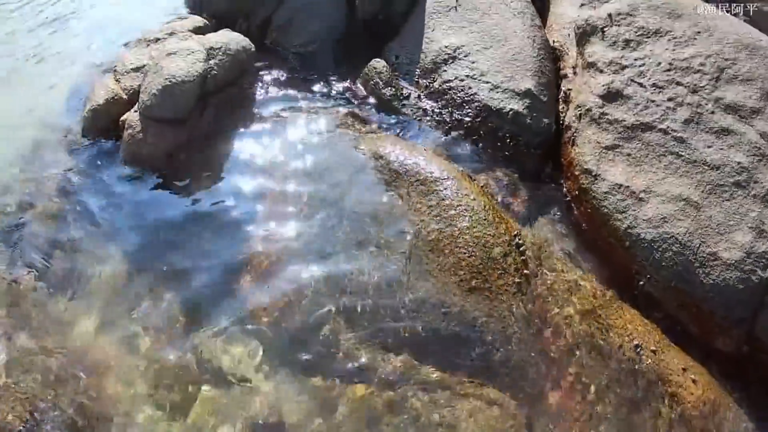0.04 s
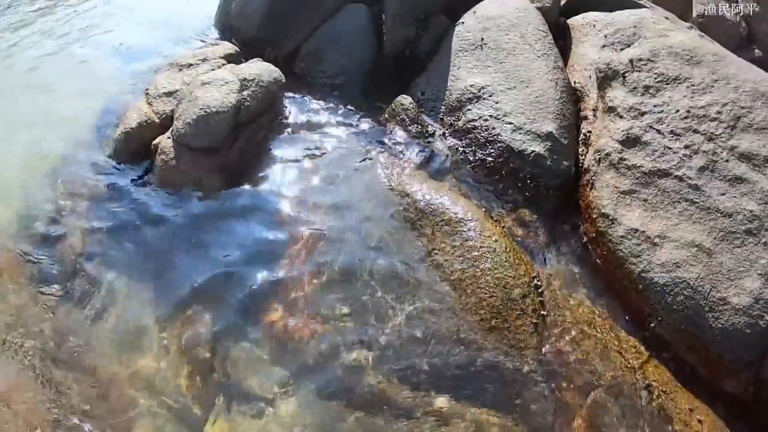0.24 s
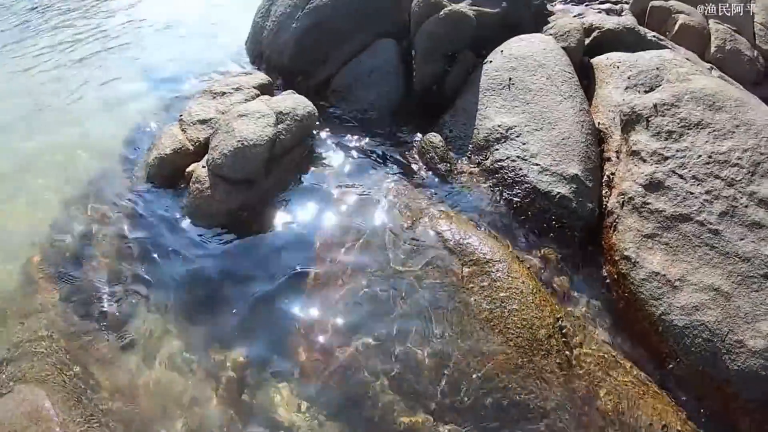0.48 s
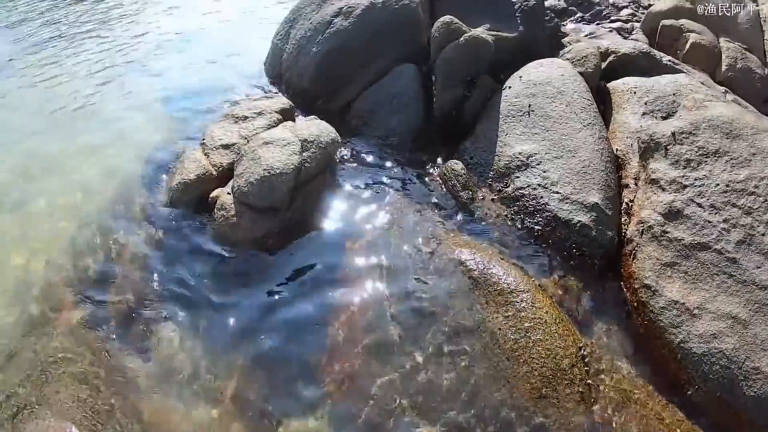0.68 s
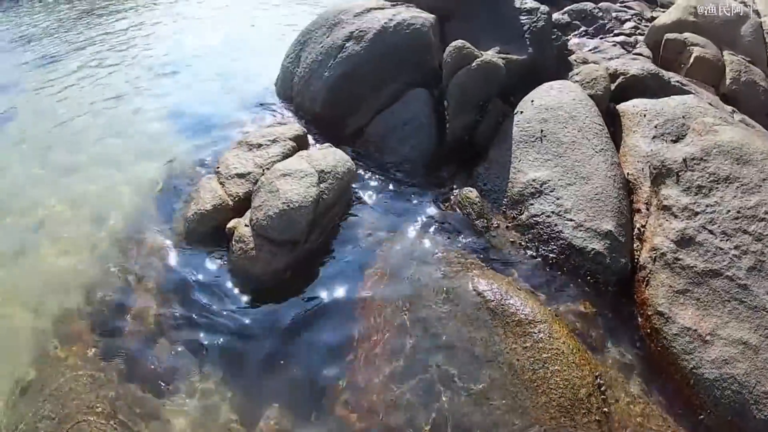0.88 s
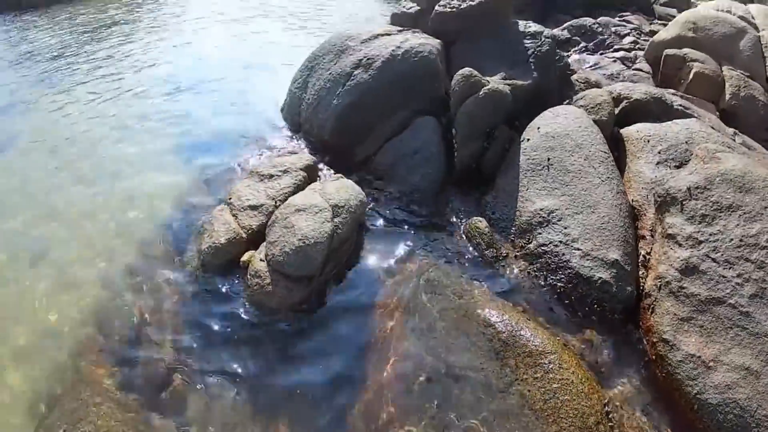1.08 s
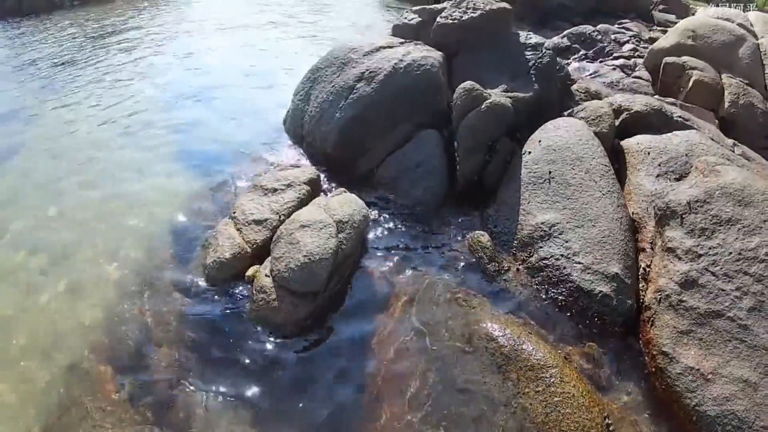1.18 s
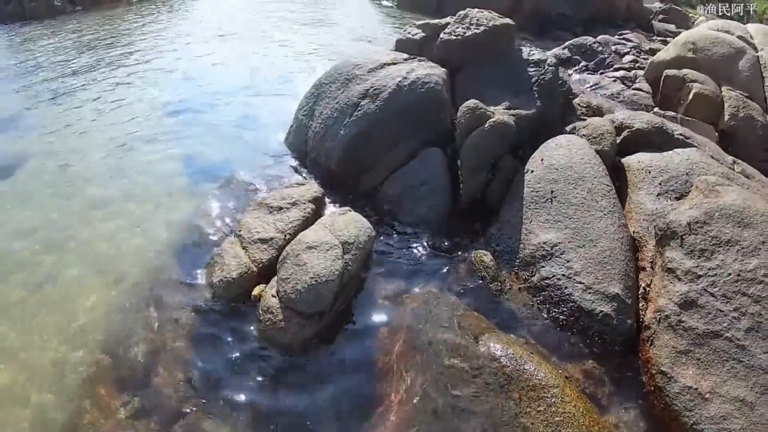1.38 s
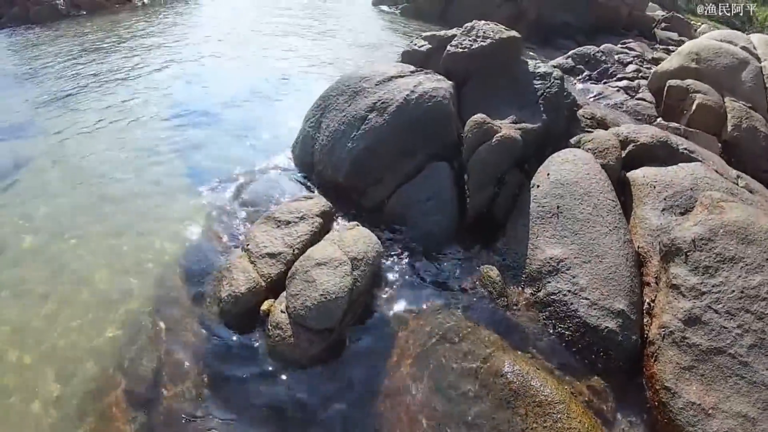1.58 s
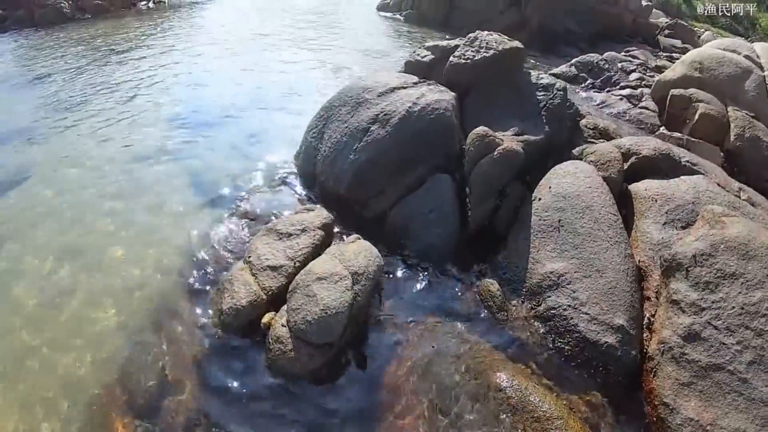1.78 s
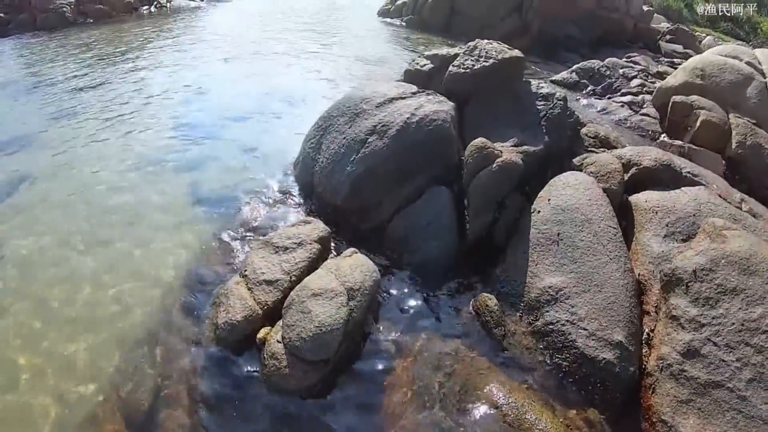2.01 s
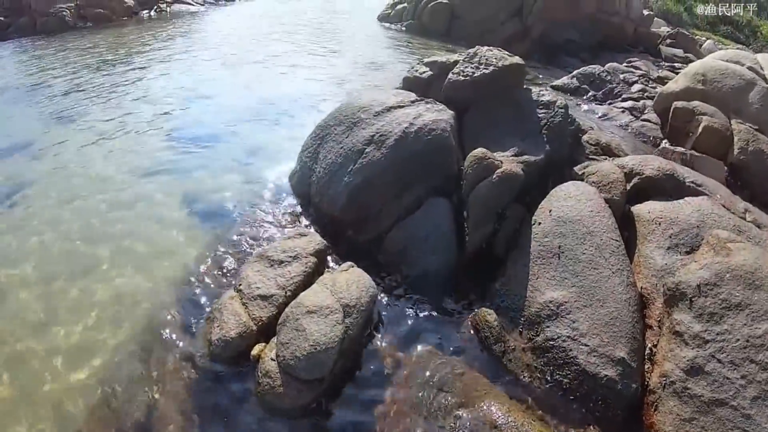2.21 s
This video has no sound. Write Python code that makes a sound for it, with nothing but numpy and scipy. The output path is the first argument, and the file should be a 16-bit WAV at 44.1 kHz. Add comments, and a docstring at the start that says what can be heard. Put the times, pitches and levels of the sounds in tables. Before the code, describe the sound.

Shallow seawater laps among rocks, with a quick gulping slap, then soft trickles.

```python
"""Faint ticks of water, then a run of sharp knocks as a wavelet slaps into a rock hollow close by.
Each impact rings a cleft between the boulders, and trapped air resonates beneath it in low gulps.
Two gentler laps follow, their bubbles ringing as damped oscillators in trickles and rising gurgles.
Behind the shallow seawater lie the hiss of the shore and a light breeze on the microphone."""
import sys
import numpy as np
from scipy import signal
from scipy.fft import rfft, irfft, next_fast_len
from scipy.io import wavfile
from scipy.ndimage import uniform_filter1d

SR = 44100
rng = np.random.default_rng(int(sys.argv[2]) if len(sys.argv) > 2 else 0)


def persist_wave(psi):
    """Save psi, clipped to +-1, as 16-bit WAV."""
    counts = np.round(np.clip(psi, -1, 1) * 32767).astype(np.int16)
    wavfile.write(sys.argv[1], SR, np.atleast_2d(counts).T)


N = 99225

# spectra of a splash's dull body and bright spray (frequency [Hz], gain [dB])
BODY_SPECTRUM = [(100, -44), (250, -6.5), (480, -5), (1000, -1.5), (1400, -3), (2500, -68.5)]
SPRAY_SPECTRUM = [(2000, -10), (3600, -6.5), (5000, 3), (6300, 3), (8500, 1), (9400, -10), (10300, -6.5),
                  (11500, -24.5), (14000, -22), (16000, -53)]


def slaps():
    """Impact excitation: water knocks in the hollow, and the cleft's normal modes ring briefly."""
    # impacts (time [s], body level [dB], clack level [dB], spray level [dB])
    impacts = np.array([(0.2205, -25.5, -19.5, -12.5), (.232, -25, -26.5, -21), (0.2455, -34, -21, -23),
                        (0.2667, -16, -23.5, -30), (0.278, -18.5, -24, -27.5), (0.294, -16, -18.5, -36.5),
                        (0.306, -16, -24, -35), (0.384, -22, -33, -60), (0.439, -24.5, -37, -56),
                        (0.4642, -22.5, -21.5, -36), (0.4813, -52, -26, -24), (0.503, -29.5, -31, -64),
                        (0.5257, -23.5, -21.5, -21.5), (0.549, -29, -33.5, -39), (0.581, -23.5, -30, -50),
                        (0.618, -33, -60, -63), (0.653, -29, -30.5, -31.5), (0.6617, -37, -32, -34.5),
                        (0.678, -31, -27.5, -38.5), (0.703, -33.5, -37, -38)])
    # modes of the cleft (frequency [Hz], relative level [dB])
    cleft_modes = [(444, 0), (706, -1), (924, 10), (1097, -5), (1173, -22), (1288, -11), (1558, 2.5),
                   (1686, -11), (1931, -10)]
    ring_db, ring_t60_s = -15, 0.083
    body = bursts(impacts[:, [0, 1]], noise(BODY_SPECTRUM), decay_s=0.0066, tail_db=-21, tail_s=0.035)
    clack = bursts(impacts[:, [0, 2]], pops(), decay_s=0.0053, tail_db=-16.5, tail_s=0.023)
    spray = bursts(impacts[:, [0, 3]], noise(SPRAY_SPECTRUM), decay_s=0.0034, tail_db=-11.5, tail_s=0.0062)
    t = np.arange(SR // 2) / SR
    modes = sum(undb(db) * np.sin(2 * np.pi * hz * t) for hz, db in cleft_modes)
    modes *= np.exp(-np.log(1000) * t / ring_t60_s)
    ring = np.zeros(N)
    for start, body_db, _, _ in impacts:
        add(ring, start, undb(body_db + ring_db) * modes)
    return place(body + clack + spray + ring, echo_db=-9, t60_s=0.032)


def gulps():
    """Cavity resonance: trapped air throbs, sinking in pitch until its pocket opens; the hollow churns."""
    # air pockets (time [s], frequency [Hz], level [dB], hold [s])
    pockets = [(0.221, 290, -22.5, 0.016), (0.254, 242, -15.5, 0.0074), (0.269, 284.6, -8.5, 0.017),
               (.27, 126.4, -20, 0.061), (0.2944, 250.4, -5, 0.026), (0.388, 264.4, -14, 0.023),
               (0.4427, 235, -19, 0.0064), (0.463, 326, -31.5, 0.0091), (0.487, 263, -23, 0.0067),
               (0.556, 275, -29, 0.03), (0.666, 242, -31.5, 0.035), (0.976, 310, -41, 0.0036),
               (1.086, 310, -45.5, 0.028), (1.849, 339, -39.5, 0.0086), (2.228, 300, -29.5, 0.0068)]
    # resonance of the air in the hollow (frequency [Hz], gain [dB])
    hollow_spectrum = [(80, -20.5), (150, -2.5), (200, 3), (275, 11), (320, 1), (390, -20), (600, -24),
                       (3000, -89)]
    attack_s, decay_s, release_s = 0.0027, 0.038, 0.0051
    sink_per_s = 2.83  # share of the starting pitch
    churn_db, churn_t60_s = -12.5, 1.07
    t, throbs = np.arange(SR) / SR, np.zeros(N)
    for start, hz, db, hold in pockets:
        envelope = np.minimum(t / attack_s, 1) * np.exp(-t / decay_s - np.maximum(t - hold, 0) / release_s)
        phase = 2 * np.pi * hz * t * (1 - sink_per_s * t / 2)
        add(throbs, start, undb(db) * envelope * np.sin(phase))
    retention = np.exp(-2 * np.log(1000) / churn_t60_s / SR)
    stored_energy = signal.lfilter([1 - retention], [1, -retention], throbs ** 2)
    churn = undb(churn_db) * np.sqrt(stored_energy) * steady(noise(hollow_spectrum), samples=1300)
    return (throbs + churn) * undb([[-1], [1]])


def splats():
    """Impact noise: ripples tick against open rock, with no cavity to ring."""
    # impacts (time [s], body level [dB], clack level [dB], spray level [dB])
    impacts = np.array([(0.084, -71, -38.5, -35), (0.172, -70, -44, -35), (0.742, -35.5, -40, -50),
                        (0.77, -38, -42.5, -45), (0.802, -31.5, -41, -33.5), (0.842, -35.5, -39.5, -37),
                        (0.892, -37, -37.5, -37), (0.968, -37, -42, -52), (1.087, -34, -37, -44),
                        (1.278, -40.5, -33, -38), (1.338, -32, -26.5, -44), (1.382, -43.5, -33, -42),
                        (1.408, -34, -31.5, -47), (1.439, -40.5, -34.5, -41.5), (1.835, -37.5, -36.5, -47),
                        (1.892, -40.5, -51, -35.5), (1.974, -35.5, -31.5, -42), (2.058, -33.5, -32, -42),
                        (2.2228, -33, -33, -46)])
    body = bursts(impacts[:, [0, 1]], noise(BODY_SPECTRUM), decay_s=0.0056, tail_db=-14, tail_s=0.043)
    clack = bursts(impacts[:, [0, 2]], pops(), decay_s=0.0048, tail_db=-45, tail_s=0.011)
    spray = bursts(impacts[:, [0, 3]], noise(SPRAY_SPECTRUM), decay_s=0.0026, tail_db=-17, tail_s=0.022)
    return place(body + clack + spray, echo_db=-13, t60_s=0.067)


def bursts(hits, grain, decay_s, tail_db, tail_s):
    """Incoherent sources add in power: a crack and a short spatter at each (time [s], level [dB])."""
    t, power = np.arange(SR // 5) / SR, np.zeros(N)
    attack = 1 - np.exp(-t / 0.00078)
    envelope = attack * (np.exp(-t / decay_s) + undb(tail_db) * np.exp(-t / tail_s))
    for start, db in hits:
        add(power, start, (undb(db) * envelope) ** 2)
    return np.sqrt(power) * steady(grain, samples=300)


def pops():
    """Pinch-off sets a crowd of bubbles ringing: the grain of a clack."""
    # middle band of a splash (frequency [Hz], gain [dB])
    clack_spectrum = [(600, -30), (1200, -7.5), (1900, 1), (2400, -0.5), (3300, -1.5), (4600, -7.5),
                      (8000, -13), (14000, -79)]
    return unit(colour(swarm(900, 6000, cycles=4, spread_db=9, count=3000), clack_spectrum))


def plinks_and_gurgles():
    """Bubble resonance: single plinks, and runs that climb as a gap fills and its bubbles get smaller."""
    # single bubbles (time [s], frequency [Hz], level [dB])
    plinks = [(.006, 1950, -29), (0.2481, 1860, -14.5), (0.2668, 1650, -16), (0.3044, 1780, -10.5),
              (0.3858, 1540, -24.5), (.5033, 1140, -26), (0.527, 3000, -17.5), (0.5813, 960, -24),
              (0.583, 515, -36.5), (0.678, 5070, -17.5), (1.0674, 4120, -29.5), (1.135, 7040, -30),
              (1.183, 635, -33.5), (1.203, 905, -31), (1.213, 4100, -30), (1.238, 2970, -32),
              (1.25, 1090, -29), (1.297, 1350, -26.5), (1.436, 4860, -29.5), (1.45, 1092, -28),
              (1.488, 3580, -32), (1.573, 3500, -39.5), (1.777, 1540, -27.5), (1.858, 2080, -31),
              (1.8753, 3930, -32), (1.948, 1650, -29), (1.961, 1210, -31), (1.976, 1460, -30.5),
              (1.997, 1640, -31), (2.048, 1450, -35), (2.061, 2630, -25), (2.076, 476, -30),
              (2.083, 2700, -32.5), (2.098, 1910, -29.5), (2.1325, 3360, -34), (2.16, 4020, -30),
              (2.170, 2960, -29.5), (2.238, 2125, -25.5)]
    # runs of bubbles (time [s], duration [s], first frequency [Hz], last frequency [Hz], level [dB])
    gurgles = [(1.17, .13, 704, 1415, -40), (2.014, 0.18, 473, 750, -39), (2.133, .07, 790, 1130, -42.5)]
    pitch_spread = 0.4
    out = np.zeros(N)
    for start, hz, db in plinks:
        add(out, start, undb(db) * bubble(hz, cycles=5.5))
    for start, duration, first_hz, last_hz, db in gurgles:
        for when, detune, strength in rng.random(size=(36, 3)):
            hz = (first_hz + (last_hz - first_hz) * when) * (1 + pitch_spread * (detune - .5))
            add(out, start + when * duration, undb(db) * 2 * strength * bubble(hz, cycles=3.5))
    return place(out, echo_db=-11.5, t60_s=0.082)


def trickle():
    """Air entrainment: each lap stirs up ringing bubbles and a fine fizz."""
    # strength of the lapping and of the fizz (time [s], relative level [dB])
    lap_levels = [(0, -44), (.2, -14), (.3, 3.5), (.6, -3.5), (.8, 1.5), (1.02, -10), (1.08, 6), (1.15, -2),
                  (1.25, 6), (1.42, -6), (1.53, -8), (1.78, -5), (1.98, 9), (2.07, 4.5), (2.14, -4.5),
                  (2.25, -3.5)]
    fizz_levels = [(0, -8), (.5, -1.5), (.95, -2.5), (1.1, 0), (1.42, -1), (1.55, -13.5), (1.78, -8),
                   (1.92, 3), (2.08, 0.5), (2.25, -6)]
    # spectrum of the larger bubbles (frequency [Hz], gain [dB])
    trickle_spectrum = [(130, -28), (350, 3.5), (800, -3), (1300, 2.5), (2200, -2), (4000, -5.5),
                        (6500, -20), (8500, -11), (15000, -33)]
    coarse = swarm(750, 4700, cycles=3.3, spread_db=12, count=1600)
    fine = swarm(3660, 14000, cycles=3.9, spread_db=10.5, count=2400)
    bubbles = undb(-47.5) * curve(lap_levels) * unit(colour(coarse, trickle_spectrum))
    fizz = undb(-56) * curve(fizz_levels) * unit(colour(fine, SPRAY_SPECTRUM))
    return place(bubbles + fizz, echo_db=-5, t60_s=0.056)


def swarm(low_hz, high_hz, cycles, spread_db, count):
    """Superposition of many bubbles of random time, pitch, strength and damping."""
    out = np.zeros(N)
    for when, pitch, strength, life in rng.random((count, 4)):
        hz = low_hz * (high_hz / low_hz) ** pitch
        add(out, when * N / SR, undb(spread_db * strength ** 3) * bubble(hz, cycles * (.5 + life)))
    return unit(out)


def bubble(hz, cycles):
    """A damped oscillator, falling by 1/e in `cycles` periods; its pitch rises as it nears the surface."""
    age = np.arange(int(5 * cycles / hz * SR)) / SR * hz / cycles  # in decay times
    pitch_rise = 0.024
    phase = 2 * np.pi * cycles * (age + pitch_rise * age ** 2 / 2)
    return np.sin(phase) * np.exp(-age) * (1 - np.exp(-age / 0.031))


def place(x, echo_db, t60_s):
    """Acoustic shadow: the left port is shaded from a near sound and hears mostly bright rock echoes."""
    # shading on the left (frequency [Hz], gain [dB])
    left_shade = [(200, -10), (380, -4), (700, -5), (1300, -38.5), (2400, -25.5), (4400, -9.5),
                  (8000, -16.5), (15000, -10.5)]
    left_lead_s, left_echo_db = .00009, 4
    # tint of the left and right echoes (frequency [Hz], gain [dB])
    tints = [(1300, -7.5), (6000, 1.5)], [(500, -3.4), (2000, 4.2)]
    i = np.arange(N)
    left = np.interp(i + left_lead_s * SR, i, colour(x, left_shade))
    echoes = np.array([scatter(x, tint, t60_s) for tint in tints])
    return np.array([left, x]) + undb([[echo_db + left_echo_db], [echo_db]]) * echoes


def scatter(x, tint, t60_s):
    """Diffuse reflection off boulders: the echo pattern shifts as the source wanders among four spots."""
    t = np.arange(SR // 6) / SR
    tails = colour(rng.standard_normal((4, len(t))), tint) * np.exp(-np.log(1000) * t / t60_s)
    spots = np.array([wander(per_s=25) for _ in tails]) ** 3
    shares = spots / np.linalg.norm(spots, axis=0)
    return sum(signal.oaconvolve(x * share, tail / np.linalg.norm(tail))[:N]
               for share, tail in zip(shares, tails))


def shore():
    """A diffuse field: more distant water blends into a soft hiss, uncorrelated between the sides."""
    # spectrum of the hiss (frequency [Hz], gain [dB])
    hiss_spectrum = [(120, -1), (200, 1), (259, 0.5), (416, 1), (836, -2.5), (1120, -2.5), (1320, -3.5),
                     (1620, -3.5), (3690, -12), (4860, -18), (6520, -5.5), (10100, -31), (16000, -66)]
    return undb(-55.5) * np.array([noise(hiss_spectrum) * undb(wander(per_s=10.74)) for _ in range(2)])


def breeze():
    """Turbulent pressure: gusts rumble on both microphone ports and buffet the left one."""
    # strength of the gusts (time [s], level [dB])
    gust_levels = [(0, -41), (0.28, -33), (0.42, -43), (0.6, -60), (0.88, -66), (1.02, -45), (1.2, -52),
                   (1.36, -51.5), (1.5, -40.5), (1.68, -38), (1.95, -34.5), (2.25, -45.5)]
    # spectrum of the rumble (frequency [Hz], gain [dB])
    rumble_spectrum = [(10, -7.5), (28, 6), (50, -4), (80, -7.5), (120, -19.5), (200, -27.5), (500, -68)]
    # pressure pulses (time [s], frequency [Hz], level [dB], duration [s])
    buffets = [(0.061, 49, -27, 0.051), (0.192, 49, -28.5, 0.094), (1.476, 36, -30, 0.089),
               (1.799, 43.6, -22, 0.093), (1.889, 69.6, -13, 0.015)]
    shared = noise(rumble_spectrum)
    rumble = np.array([unit(noise(rumble_spectrum) + 0.85 * shared) for _ in range(2)])
    ports = rumble * curve(gust_levels) * undb([[3], [-1]])
    for centre, hz, db, duration in buffets:
        t = np.arange(N) / SR - centre
        ports[0] += undb(db) * np.cos(2 * np.pi * hz * t) * np.exp(-(2 * t / duration) ** 2)
    return ports


def colour(x, spectrum):
    """Minimum-phase filter through (frequency [Hz], gain [dB]) points."""
    size = 2 * next_fast_len(x.shape[-1] // 2 + 4096, True)
    hz, db = np.array(spectrum).T
    log_bins = np.log(np.fft.rfftfreq(size, 1 / SR) + 1)
    cepstrum = irfft(np.log(undb(np.interp(log_bins, np.log(hz), db))))
    cepstrum[1:size // 2] *= 2  # folding makes the response causal
    cepstrum[size // 2 + 1:] = 0
    return irfft(rfft(x, size) * np.exp(rfft(cepstrum)), size)[..., :x.shape[-1]]


def noise(spectrum):
    """Filtered Gaussian noise of rms 1."""
    return unit(colour(rng.standard_normal(N), spectrum))


def wander(per_s):
    """Slow random fluctuation of rms 1."""
    hold = max(int(SR / per_s), 1)
    steps = rng.standard_normal(1024)[np.arange(N) // hold % 1024]
    return unit(uniform_filter1d(steps, hold))


def curve(points):
    """Gain envelope through (time [s], level [dB]) points."""
    return undb(np.interp(np.arange(N) / SR, *np.array(points).T))


def steady(x, samples):
    """Divide by the running rms to even out the level."""
    return x / np.sqrt(uniform_filter1d(x ** 2, samples) + 1e-9)


def unit(x):
    """Normalise to rms 1."""
    return x / np.sqrt(np.mean(x ** 2) + 1e-18)


def undb(db):
    """Decibels to amplitude ratio."""
    return 10 ** (np.asarray(db) / 20)


def add(out, start_s, sound):
    """Superpose a sound at its start time."""
    i = int(np.clip(start_s * SR, 0, N - 1))
    out[i:i + len(sound)] += sound[:N - i]


def scene():
    """Linear superposition of water and wind, in stereo."""
    return slaps() + splats() + gulps() + plinks_and_gurgles() + trickle() + shore() + breeze()


def record(dry):
    """Band limiting: a steep low-pass removes the highest treble."""
    cutoff_hz = 15900
    return signal.sosfilt(signal.ellip(8, .2, 70, cutoff_hz, fs=SR, output="sos"), dry)


dry = scene()
out = record(dry)
persist_wave(out)
```